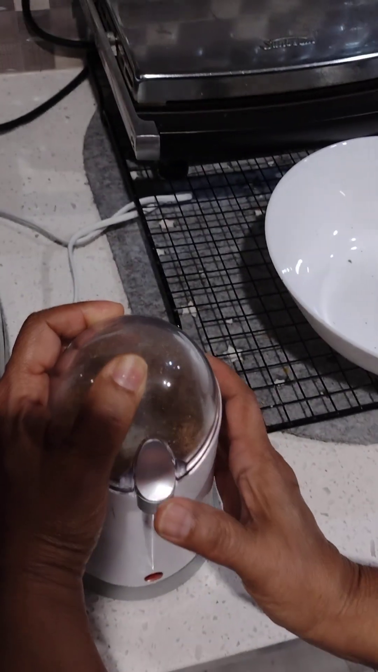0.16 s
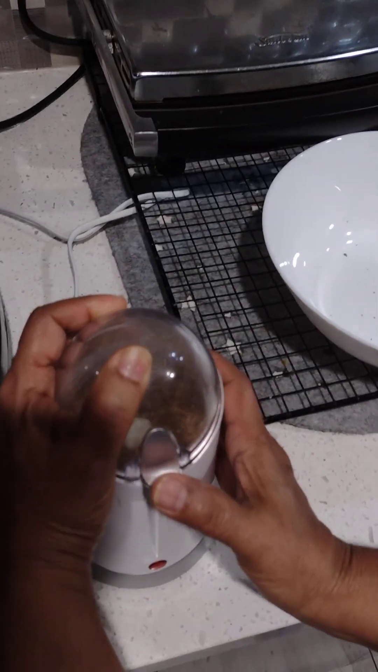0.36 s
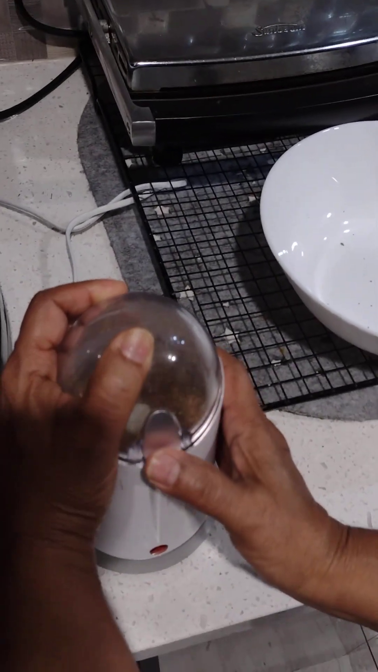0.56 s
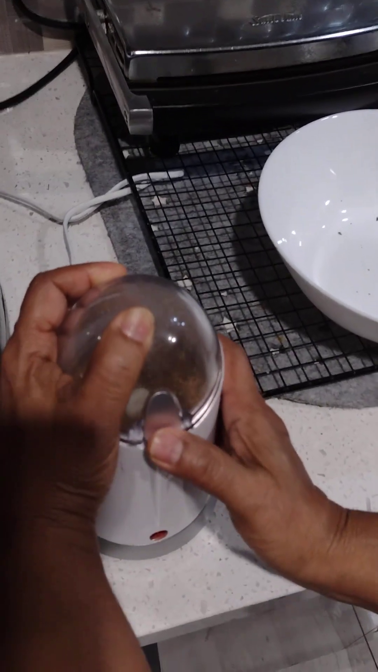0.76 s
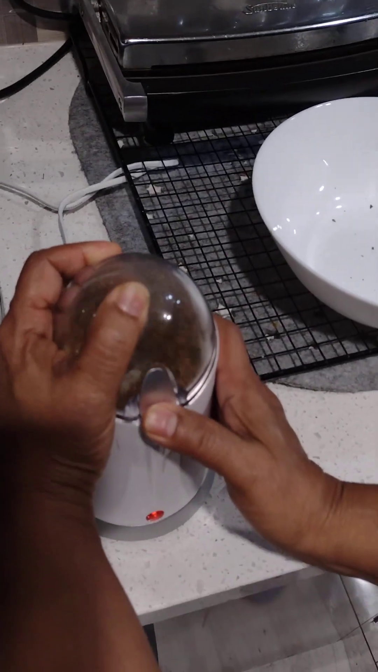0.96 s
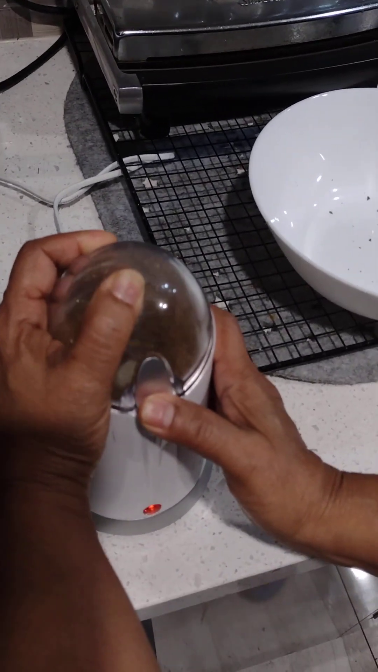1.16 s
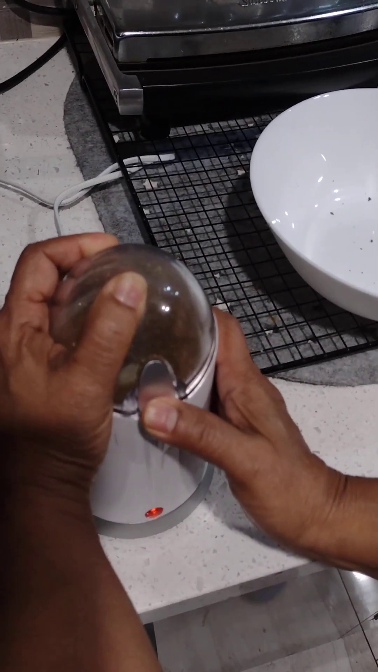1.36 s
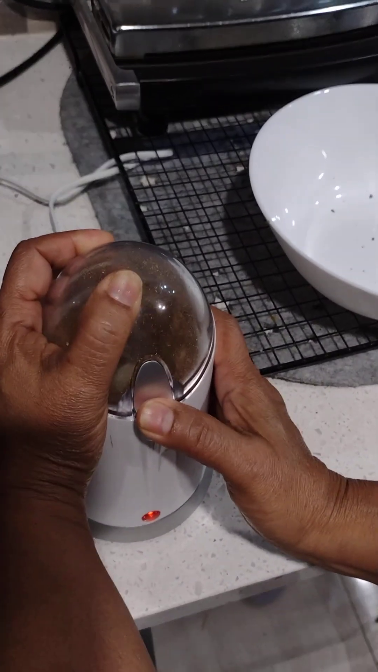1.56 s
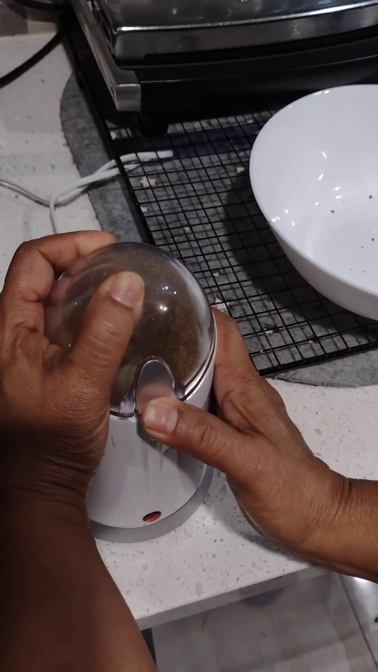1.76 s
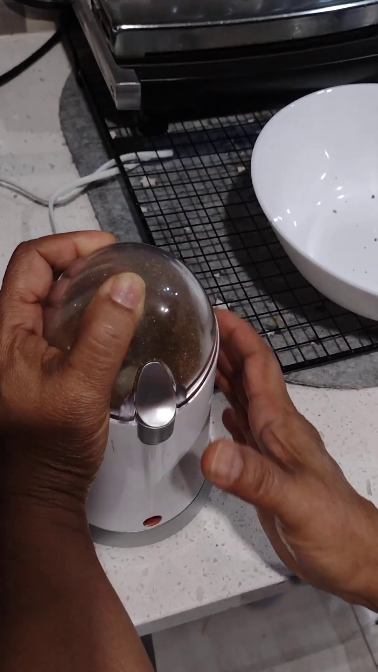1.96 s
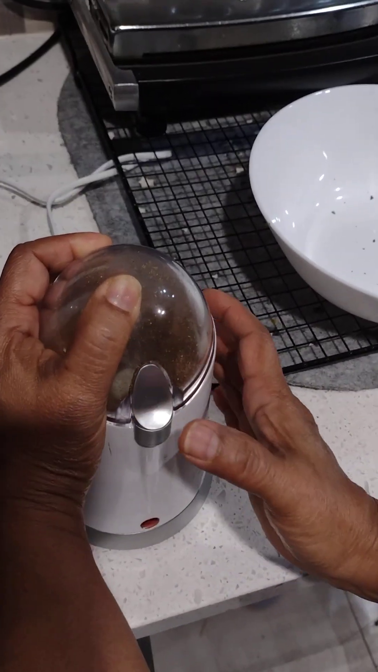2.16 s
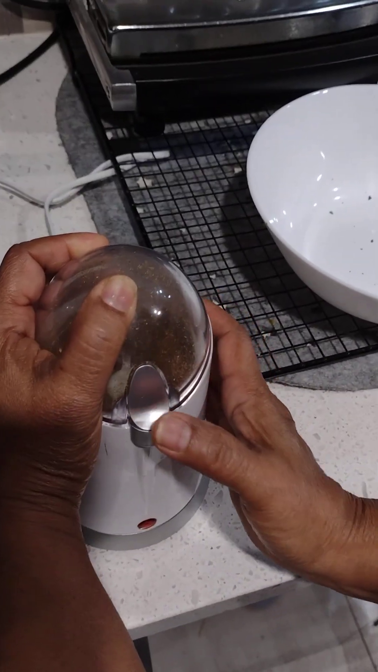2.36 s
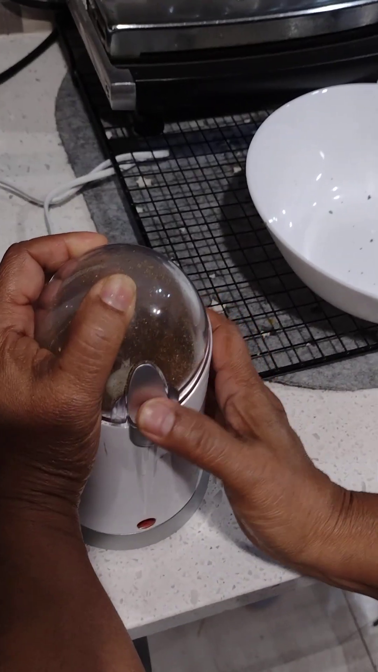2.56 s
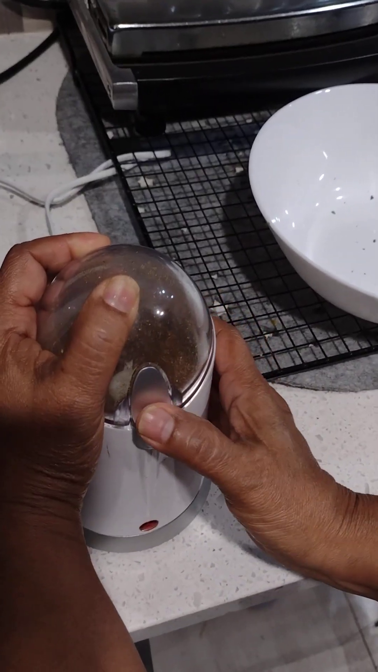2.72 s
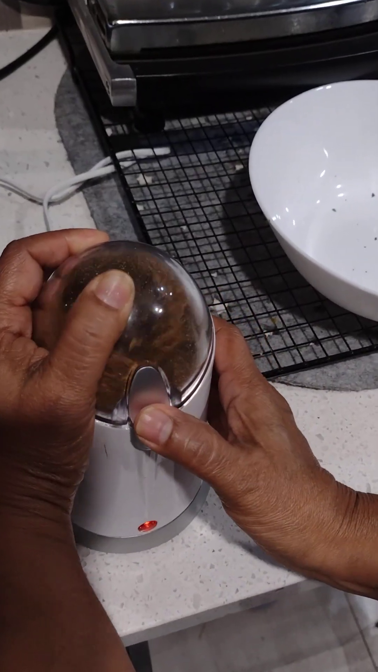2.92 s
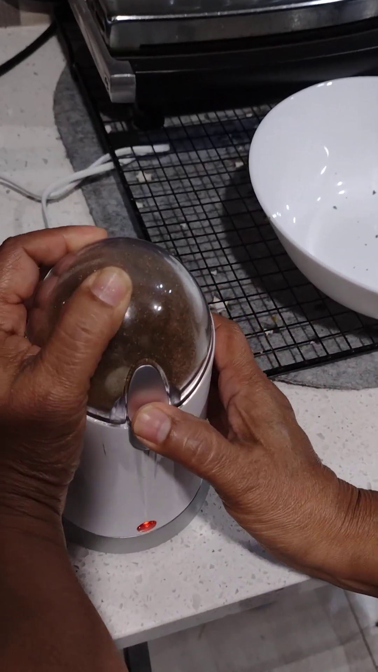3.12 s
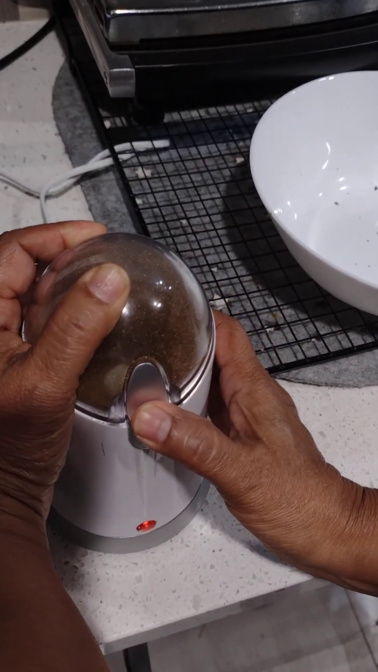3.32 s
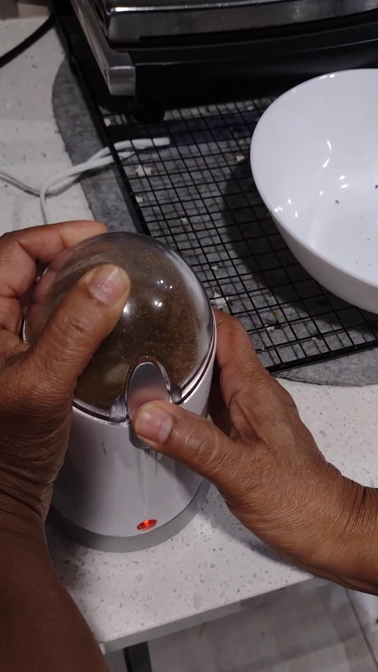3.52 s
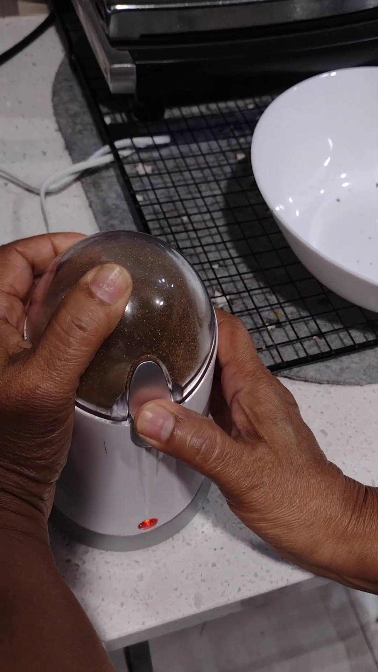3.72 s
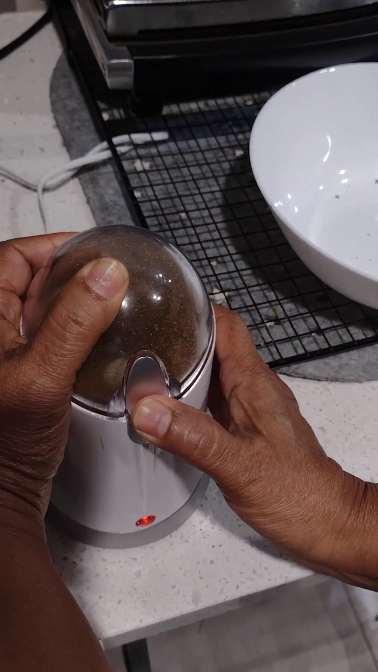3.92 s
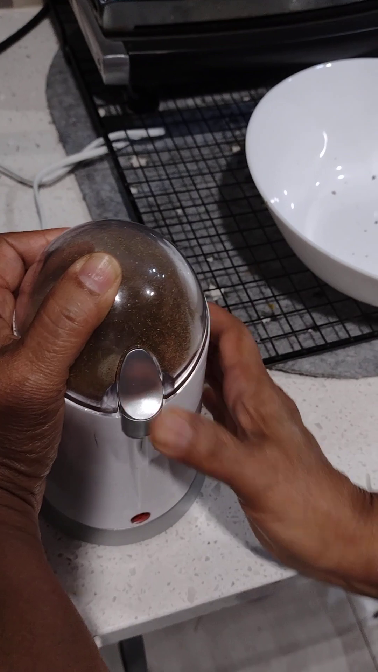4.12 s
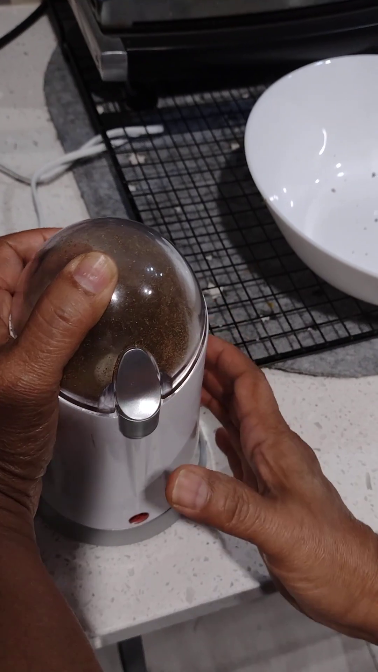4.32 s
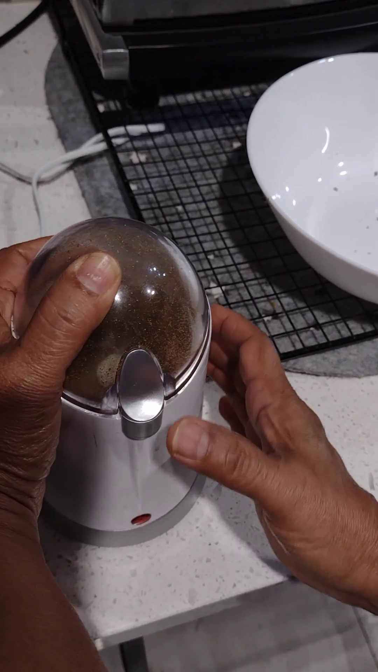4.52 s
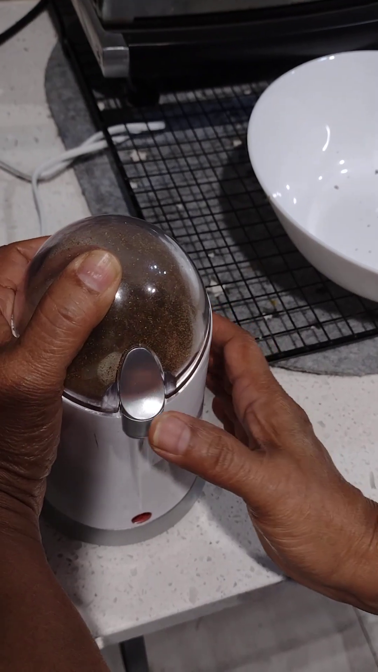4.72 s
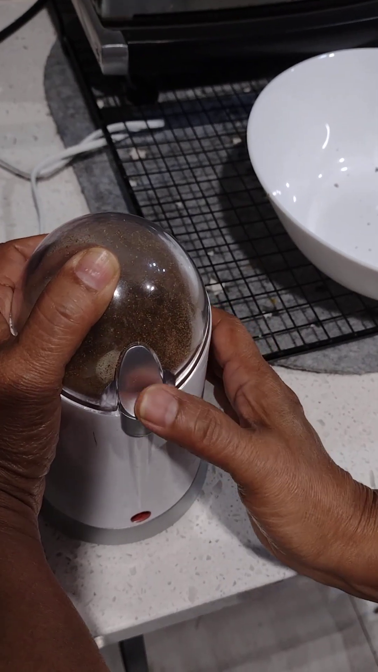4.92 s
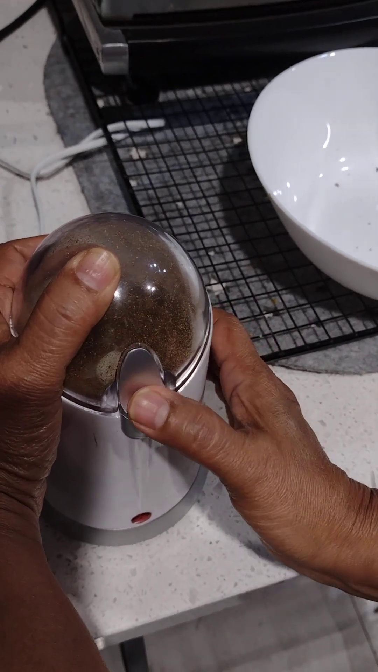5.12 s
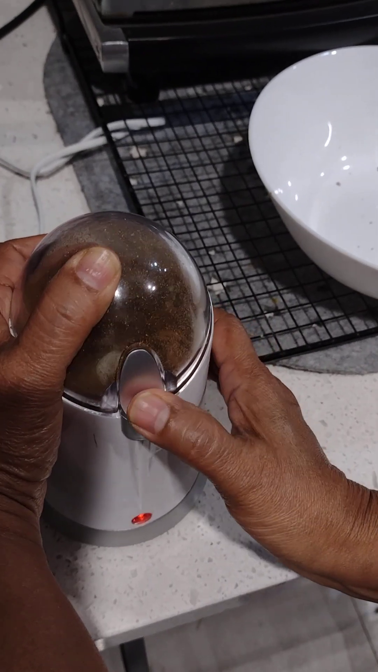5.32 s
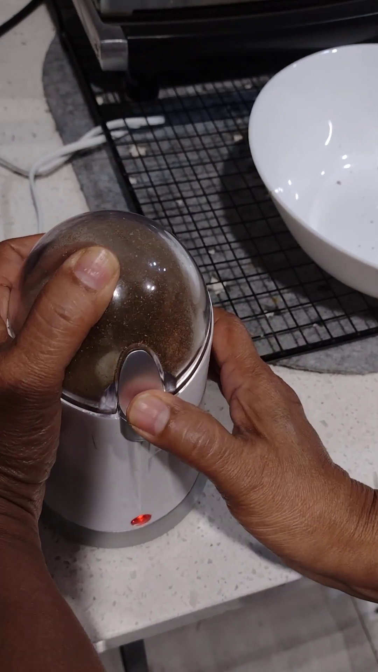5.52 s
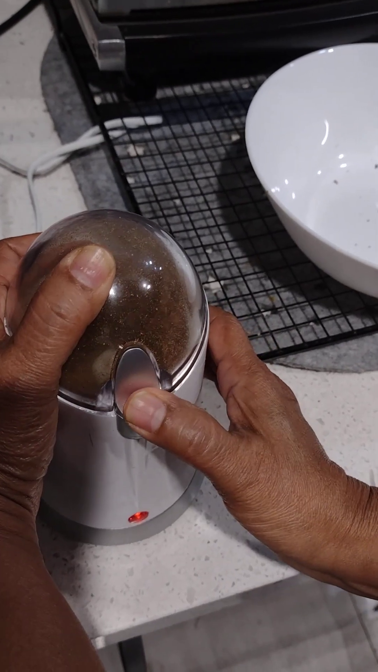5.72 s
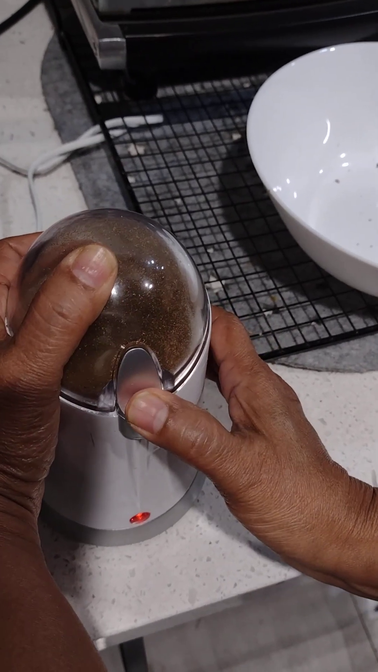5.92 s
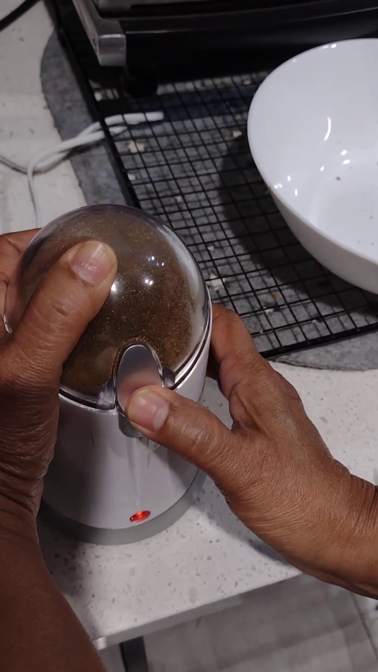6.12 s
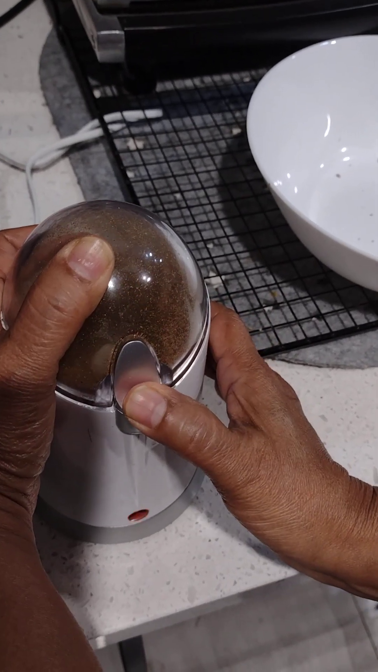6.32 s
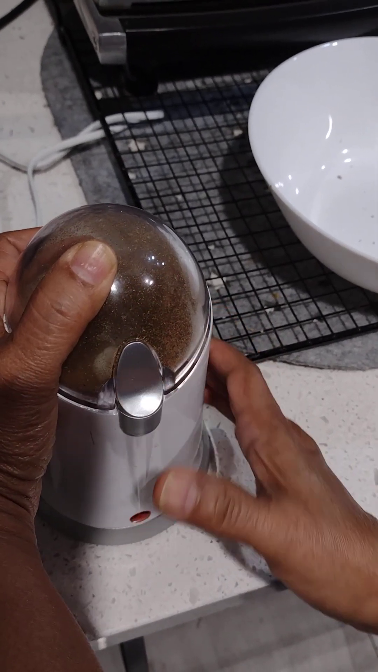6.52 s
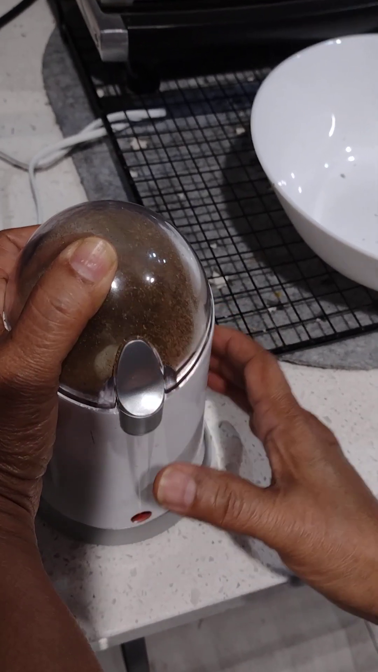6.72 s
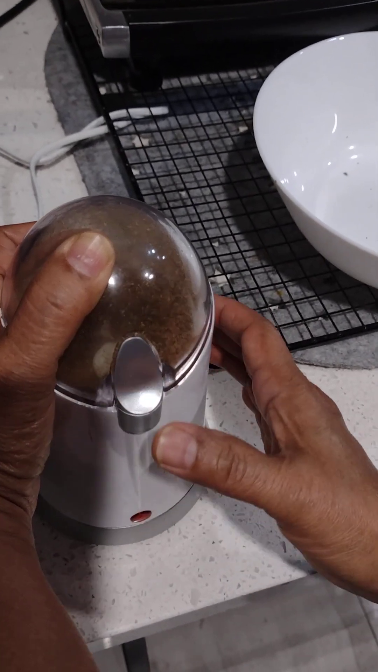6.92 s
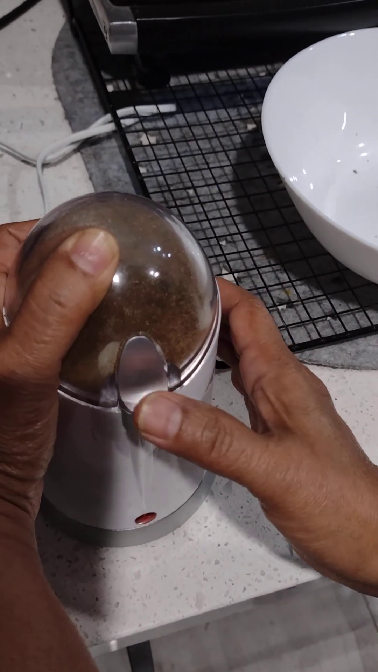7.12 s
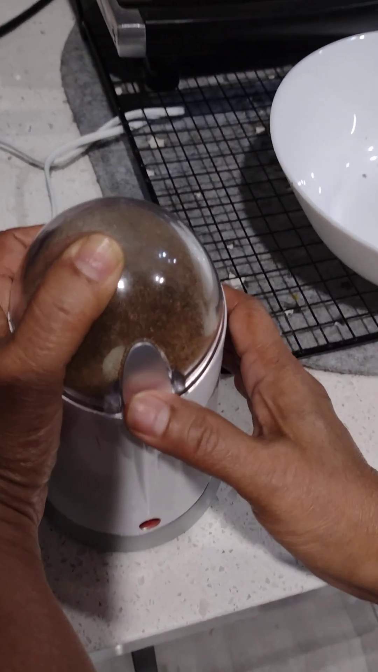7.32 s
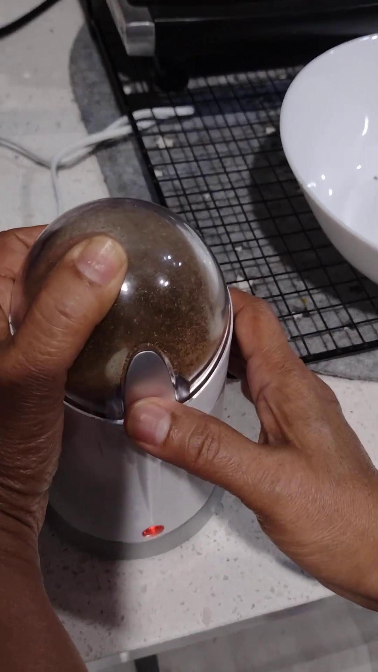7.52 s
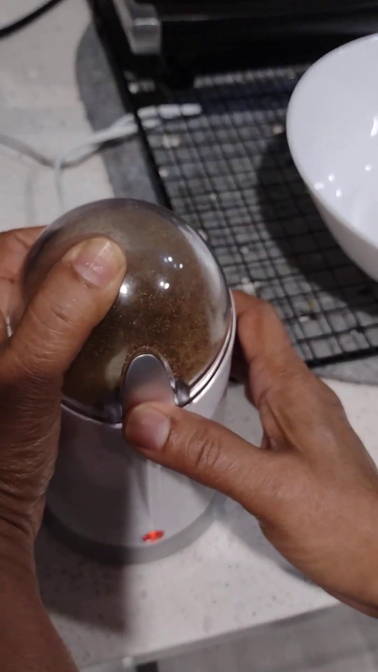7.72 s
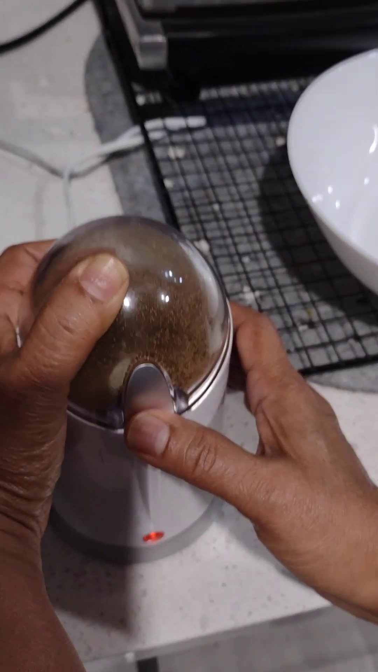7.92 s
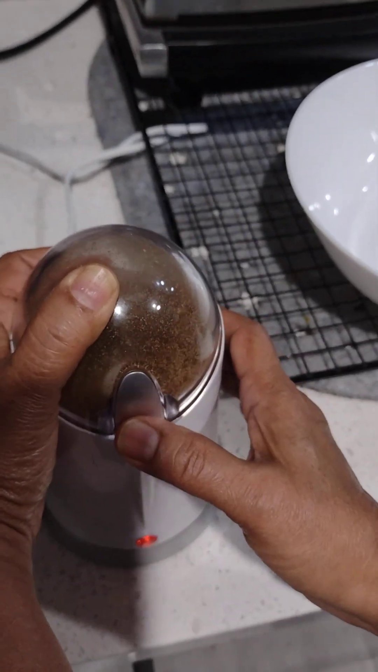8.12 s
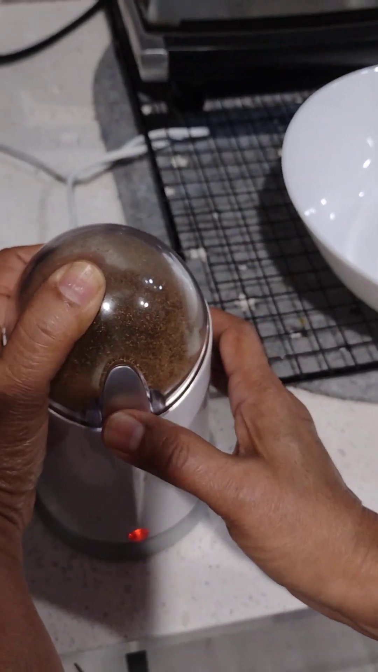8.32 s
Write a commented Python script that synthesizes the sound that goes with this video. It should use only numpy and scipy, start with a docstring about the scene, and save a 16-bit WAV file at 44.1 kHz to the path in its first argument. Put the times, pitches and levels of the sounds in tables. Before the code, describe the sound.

A small blade grinder heard close, in stereo, in a kitchen with short reflections and very quiet room tone. At 0 s it is already slowing: falling motor whir, loud coarse clatter and sharp cracks, settling by about 0.4. At 0.9 a thump and jerk start a burst; pitch climbs fast into a rough buzz with high brush whine, bright gritty hiss and dense rattle, cracks near 1.2 and 1.5. Released at 1.8, it winds down with pieces knocking and rolling until about 2.4. A longer burst runs 2.95 to 4.1, coasting with cracks to about 4.7. A soft thumb tap at 5.1 precedes a run from 5.3 to 6.4, its spice finer and somewhat softer, then rolling and knocking down to 7.0. The last burst starts at 7.6 with a grainy surge, spins up a little quicker, and is still whirring at full tilt when it cuts off around 8.5.

```python
"""A small blade grinder on a kitchen counter coasts to rest, then runs four more times, the last to the end.
Its spinning rotor shakes the housing into ringing, buzzes in overtones, whines at the brushes and hums.
Hard spice is random impacts: fine grit hisses and coarse pieces rattle, thud at the start and roll as it slows.
Whole pieces crack on lid and blade, and a thumb lands on the button once.
The room adds short reflections and a quiet tone; two microphone ports hear it all."""
import sys
import numpy as np
from scipy import signal
from scipy.fft import rfft, irfft, next_fast_len
from scipy.io import wavfile

SR = 44100
rng = np.random.default_rng(int(sys.argv[2]) if len(sys.argv) > 2 else 0)


def transcribe(signal):
    """Save signal, clipped to [-1, 1], as a 16-bit WAV file at the path in sys.argv[1]."""
    frames = np.atleast_2d(signal).T
    limited = np.clip(frames, -1, 1)
    pcm = np.round(limited * 32767).astype(np.int16)
    wavfile.write(sys.argv[1], SR, pcm)


N = 368808
TIME = np.arange(N) / SR   # seconds
SIZE = next_fast_len(N + SR // 2) // 2 * 2   # even length for the spectrum, with room for tails
FREQS = np.maximum(np.arange(SIZE // 2 + 1) * SR / SIZE, 1)   # Hz
MAINS_HZ = 50

TOP_HZ = 376   # turns per second that a long run approaches
JERK_SHARE, JERK_S = 0.335, 0.048   # part of that speed won by the first jerk, and its time constant
DRAG_S, FRICTION_HZ_PER_S = 2.0, 464   # coasting: time constant of the drag, steady braking of the bearings


def rotor_speed(on, off, spin_up_s):
    """Turns per second: a jerk and a slower climb, then drag and friction bring the rotor to rest."""
    driven = np.clip(TIME - on, 0, off - on)
    coasted = np.maximum(TIME - off, 0)
    jerk_left = JERK_SHARE * np.exp(-driven / JERK_S)
    climb_left = (1 - JERK_SHARE) * np.exp(-driven / spin_up_s)
    reached = TOP_HZ * (1 - jerk_left - climb_left)
    braking = FRICTION_HZ_PER_S * DRAG_S
    return np.maximum((reached + braking) * np.exp(-coasted / DRAG_S) - braking, 0)


# Each press of the button; finer spice lets the rotor gather speed sooner:
# on_s, off_s, spin_up_s, whine_db (relative), hollow_db (spice lost at the hollow), grip_db (damping by the hand)
RUNS = [(-1.3, -0.285, 0.21, -38, 0, 0), (0.885, 1.798, 0.203, -33.5, 3, 7),
        (2.951, 4.098, 0.196, -32, 3, 0.5), (5.269, 6.405, 0.185, -35, 6, 0),
        (7.592, 8.6, 0.177, -33.5, 6, -2)]
HOLLOW_S, HOLLOW_WIDTH_S = 0.115, 0.04   # soon after the start the blade has dug a hollow in the heap
GRIT_FOLLOWS, RATTLE_FOLLOWS = 0.3, 0.3   # loudness grows as this power of the speed
GRIT_SETTLES_S, GRIT_FALL_DB_PER_S = 0.492, 160   # after release the fine grit comes down first
RATTLE_SETTLES_S, RATTLE_FALL_DB_PER_S = 0.575, 175   # the coarse pieces roll a little longer


def controls(switch_s=0.013):
    """Each press sets speed, current on/off, and the levels of housing shake, whine, grit and rattle."""
    speed, power, damping_db, whine, grit, rattle = np.zeros((6, N))
    for on, off, spin_up_s, whine_db, hollow_db, grip_db in RUNS:
        turns = rotor_speed(on, off, spin_up_s)
        started = np.clip((TIME - on) / switch_s, 0, 1)
        held = started * np.clip((off - TIME) / switch_s + 1, 0, 1)
        stirred = started * from_db(-hollow_db * swell(on + HOLLOW_S, HOLLOW_WIDTH_S))
        speed += turns
        power += held
        damping_db += grip_db * (turns / TOP_HZ) ** 6   # the hand damps the fastest shaking most
        whine += held * from_db(whine_db)
        grit += stirred * airborne(turns, off, GRIT_FOLLOWS, GRIT_SETTLES_S, GRIT_FALL_DB_PER_S)
        rattle += stirred * airborne(turns, off, RATTLE_FOLLOWS, RATTLE_SETTLES_S, RATTLE_FALL_DB_PER_S)
    grit_db, rattle_db = load()
    return speed, power, from_db(-damping_db), whine, grit * from_db(grit_db), rattle * from_db(rattle_db)


# Ringing of the housing on the counter, shaken once a turn: pitch_hz, width_hz, level_db
HOUSING = [(119, 14, -46), (190, 14, -36.5), (254, 22, -31.5), (323, 10, -39.5), (361.8, 12, -45)]


def rotor(angle, pace):
    """Imbalance sweeps through the housing resonances; at a crawl it fades and the rotor knocks twice a turn."""
    crawling = np.clip((0.42 - pace) / 0.087, 0, 1)
    knock = from_db(-10.5) * np.sin(2 * angle) * crawling
    strength = np.minimum(pace / 0.46, 1) ** 1.8
    flicker = from_db(1.4 * drift(25))
    shake = np.sqrt(2) * (np.sin(angle) + knock) * strength * flicker
    return sum(from_db(db) * resonate(shake, hz, width) for hz, width, db in HOUSING)


# Overtones of the rotation, some shifted by the pulsing torque:
# multiple (of the turning rate), offset_hz, level_db (at full speed, under power)
ORDERS = [(1, 100, -59.5), (1, 200, -57), (2, 0, -58), (2, 200, -55), (3, -100, -57), (3, 0, -52),
          (3, 100, -58), (4, -100, -49.5), (4, 0, -44.5), (4, 100, -57), (5, 0, -49), (5, 100, -48.5),
          (6, 0, -55), (8, 0, -59.5), (9, 0, -57)]
# Without the pulsing torque the low overtones stand out and the high ones fade.
COAST_LIFT_DB, COAST_FADE_DB_PER_ORDER = 9, 2.2


def buzz(angle, speed, pace, power):
    """Rough overtones, coloured by the cup; the offset ones sound only while current flows."""
    wobble = (0.054 + 0.04 * (1 - power)) * drift(45)   # radians, roughens the tones
    out = np.zeros(N)
    for multiple, offset_hz, db in ORDERS:
        k = round(multiple)
        offset = round(offset_hz / MAINS_HZ) * MAINS_HZ
        cup_db = at_hz(RATTLE, k * speed + offset) - at_hz(RATTLE, k * speed.max() + offset)
        line = np.sin(k * (angle + wobble) + 2 * np.pi * (offset * TIME + rng.random()))
        if offset:
            presence = power
        else:
            presence = from_db((COAST_LIFT_DB - COAST_FADE_DB_PER_ORDER * k) * (1 - power))
        out += from_db(db + cup_db + 2.0 * drift(20)) * line * presence
    return np.sqrt(2) * out * pace ** 1.18


# How well the housing passes on the whine: pitch_hz, gain_db
WHINE_GAIN_DB = [(2650, -22), (2950, -9.5), (3150, -3.5), (3400, -3), (3660, 1), (3780, -1)]


def commutator(angle, speed, mains, count=10):
    """Ten segments pass the brushes each turn; torque pulsing twice a mains cycle adds side tones."""
    phase = count * angle + 0.18 * drift(50)
    upper = from_db(-3) * np.sin(phase + 2 * mains)
    lower = from_db(-12) * np.sin(phase - 2 * mains)
    tone = np.sin(phase) + upper + lower
    return tone * from_db(at_hz(WHINE_GAIN_DB, count * speed) + 1.5 * drift(23))


# Magnetic hum of the fixed coils: pitch_hz, level_db (at full speed)
HUM = [(100, -65), (200, -55), (300, -70)]


def stator(mains, pace, inrush_db=15):
    """The hum is strongest while the slow rotor draws a heavy current."""
    lines = sum(from_db(db) * np.sin(round(hz / MAINS_HZ) * mains) for hz, db in HUM)
    inrush = inrush_db * np.minimum(1 - pace ** 2, 0.8)
    return np.sqrt(2) * lines * from_db(inrush + 0.71 * drift(12))


# Colour of the coarse pieces: pitch_hz, level_db per Hz (relative)
RATTLE = [(40, -36.5), (90, -20), (150, -24.5), (250, -10.5), (400, -19), (560, -12.5), (800, -15.5),
          (1200, -12.5), (1510, -0.3), (1720, -3), (1980, -0.5), (2400, -12), (3300, -12), (4400, -13),
          (6000, -32)]
# Colour of the fine grit: pitch_hz, level_db per Hz (relative)
GRIT = [(1000, -30.5), (2500, -6.5), (3000, -5.5), (3450, 0.5), (4300, 0.5), (5100, -2.5), (6100, -2.5),
        (7300, -5), (8400, 3), (9300, -0.5), (11400, -1), (12400, -3.5), (13200, -3.5), (14000, -6.5),
        (15800, -7.5)]
CUP_HZ, CUP_WIDTH_HZ, CUP_DB = 1530, 200, 3.5   # ring of the cup under slowly rolling pieces
ROLLS_BELOW = 0.6   # share of full speed below which the coarse pieces start to roll


def spice(angle, pace, throb, grit, rattle):
    """Faster blades strike more often; hits bunch once a turn and as chips shatter; slow pieces roll."""
    clumps = from_db(0.67 * drift(40)) * (1 + 0.15 * np.sin(angle)) * (1 + 0.026 * throb)
    clumps *= chips(per_s=75, fade_s=0.0055, share=0.35)
    fine = grains(per_s=5000 + 14000 * pace, spread_db=3.0) * from_db(0.7 * drift(70)) * clumps * grit
    coarse = grains(per_s=1800 + 3500 * pace, spread_db=2.0) * clumps * rattle
    rolling = np.clip(1 - pace / ROLLS_BELOW, 0, 1)
    cup = from_db(CUP_DB) * resonate(coarse * rolling, CUP_HZ, CUP_WIDTH_HZ)
    hiss = from_db(-2.3) * colour(fine, GRIT)
    clatter = from_db(-4.3) * colour(coarse * (1 - rolling / 2), RATTLE)
    return hiss + clatter + cup


def chips(per_s, fade_s, share):
    """Gain from random shatterings: each throws up a spray at once, which then thins out; mean power 1."""
    hits = (rng.random(N) < per_s / SR) * np.minimum(rng.exponential(1, N), 3)
    spray = signal.lfilter([1], [1, -np.exp(-1 / (fade_s * SR))], hits + 1e-12)
    return np.sqrt(1 - share + share * spray / spray.mean())


def airborne(speed, off, follows, settles_s, fall_db_per_s):
    """Gain of the flying spice: it follows the blade's speed until it settles, then dies away."""
    settle = off + settles_s
    pace = np.interp(np.minimum(TIME, settle), TIME, speed) / TOP_HZ
    return pace ** follows * from_db(-fall_db_per_s * np.maximum(TIME - settle, 0))


# Spice in the path of the blade: time_s, grit_db, rattle_db (both relative)
LOAD = [(0.05, -27, -27), (0.3, -31, -28), (0.9, -29.5, -30), (1.57, -29, -29.5), (1.63, -35, -35),
        (1.8, -33.5, -35), (2.05, -30, -31), (2.4, -29.5, -30), (2.95, -30, -31), (3.6, -30.5, -30.5),
        (4.2, -31.5, -32.5), (4.7, -34, -31.5), (5.3, -33, -32.5), (5.95, -31.5, -31), (6.45, -31.5, -32.5),
        (7.0, -35.5, -31), (7.65, -35.5, -32.5), (8.3, -35, -30.5)]
# Clumps sliding into the blade: time_s, half_length_s, grit_swell_db, rattle_swell_db
CLUMPS = [(0.925, 0.025, 2.5, 5.5), (1.105, 0.025, 2.5, 2.5), (2.137, 0.02, 3, 3), (2.235, 0.02, 2, 2),
          (2.985, 0.025, 4, 4.5), (3.155, 0.015, 4, 0), (3.92, 0.02, 3, 0), (4.48, 0.025, 4, 2),
          (5.3, 0.018, 1, 3.5), (5.57, 0.035, 3, 0), (7.64, 0.02, 5, 1), (7.82, 0.04, 7, 3.5),
          (8.235, 0.025, 3, -2)]


def load():
    """Levels of grit and rattle in dB: the slowly changing charge, plus a swell for each clump."""
    s, *levels = np.transpose(LOAD)
    slow = np.array([np.interp(TIME, s, db) for db in levels])
    return slow + sum(np.outer(swell_db, swell(at, half_s)) for at, half_s, *swell_db in CLUMPS)


# Hard pieces hitting lid and blade: time_s, knock_db, ping_db (both relative)
CRACKS = [(0.0363, -36, -27), (0.0517, -33, -24), (0.0817, -23, -26), (0.1171, -18, -19.5),
          (0.1204, -21.5, -22), (1.1997, -26, -22.5), (1.271, -26, -29), (1.5007, -21.5, -30),
          (1.5526, -23, -20), (1.5651, -21, -17), (2.0093, -25, -32), (2.1236, -23, -30),
          (2.2378, -24, -27), (2.2563, -19.5, -33), (3.0098, -32, -17.5), (3.1363, -20, -20),
          (3.4426, -25, -23), (3.5633, -25, -24.5), (3.9727, -26, -19), (4.2742, -30, -24),
          (4.459, -24, -30), (4.5854, -23, -37), (4.593, -23.5, -43), (6.404, -23.5, -26),
          (6.482, -29, -26), (6.7508, -28.5, -34), (6.8456, -25, -25), (6.9169, -24, -26.5),
          (8.1703, -25, -33)]
# Colour of a knock on the lid: pitch_hz, level_db per Hz (relative)
LID_KNOCK = [(300, -25.5), (1600, -10), (2400, -9), (3000, -1), (4100, 1), (5500, -8.5), (8000, -16.5),
             (16000, -27)]
# Colour of a ping on the blade: pitch_hz, level_db per Hz (relative)
BLADE_PING = [(2000, -30), (6000, -13), (7600, -9), (8500, 1.5), (9400, -4.5), (11500, -5), (16000, -16.5)]


def cracks():
    """Whole pieces knock on the lid and ping on the steel blade."""
    s, knock_db, ping_db = np.transpose(CRACKS)
    knock = bursts(s, knock_db, snap_s=0.0014, scatter_s=0.012, scatter_db=-17.5)
    ping = bursts(s, ping_db, snap_s=0.0013, scatter_s=0.0078, scatter_db=-18)
    return from_db(0.8) * colour(knock, LID_KNOCK) + from_db(1.6) * colour(ping, BLADE_PING)


# Colour of the starting jolt: pitch_hz, level_db per Hz (relative)
START_THUMP = [(25, -16), (70, -3), (200, 0.5), (400, -5.5), (600, 1.5), (1000, -2), (1600, -1.5),
               (2500, -18), (8000, -33.5)]
RELEASE_JOLT_DB = -47


def start_kick(delay_s=0.016, level_db=-41):
    """Starting torque jerks the housing and shoves the blade into the heap; letting go jolts it less."""
    starts = [(on + delay_s, level_db) for on, *_ in RUNS]
    releases = [(off, RELEASE_JOLT_DB) for _, off, *_ in RUNS]
    s, db = np.transpose([(s, db) for s, db in starts + releases if 0 < s < N / SR])
    return colour(bursts(s, db, snap_s=0.012, scatter_s=0.05, scatter_db=-2), START_THUMP)


# Thumb landing on the button: time_s, level_db (relative)
TAPS = [(5.111, -50)]


def button():
    """The thumb jolts the plastic lid: a short burst in the colours of rattle, grit and thump."""
    s, db = np.transpose(TAPS)
    jolt = bursts(s, db, snap_s=0.0026, scatter_s=0.024, scatter_db=-6.5)
    rattle = from_db(-9) * colour(jolt, RATTLE)
    grit = from_db(-2) * colour(jolt, GRIT)
    thump = from_db(-7) * colour(jolt, START_THUMP)
    return rattle + grit + thump


def kitchen(x, t60, wet_db):
    """Reflections off counter and walls: a fading noise tail (60 dB in t60 s), different at each side."""
    age = np.arange(SR // 2) / SR
    tail = rng.standard_normal((2, len(age))) * from_db(-60 * age / t60) * (age > 0.002)
    tail /= np.sqrt(np.sum(tail ** 2, axis=1, keepdims=True))
    return x + from_db(wet_db) * signal.fftconvolve(x[None], tail, axes=1)[:, :N]


# Colour of the quiet room: pitch_hz, level_db per Hz (relative)
ROOM_TONE = [(25, -18.5), (70, -8.5), (130, -2.5), (230, 6), (330, -3.5), (550, -0.5), (1000, -6.5),
             (2000, -16), (3500, -17), (6000, -23), (10000, -24.5), (16000, -28.5)]


def room_tone():
    """Soft coloured noise, mostly shared by both sides, with a flickering level."""
    shared = rng.standard_normal(N) * from_db(1.6 * drift(15))
    separate = 0.25 * rng.standard_normal((2, N))
    return from_db(-63) * colour(shared + separate, ROOM_TONE)


def scene():
    """The grinder in the kitchen, over a quiet room tone."""
    speed, power, shake, whine, grit, rattle = controls()
    angle = 2 * np.pi * np.cumsum(speed) / SR
    pace = speed / speed.max()   # share of full speed
    mains = 2 * np.pi * MAINS_HZ * TIME
    throb = power * np.cos(2 * mains)
    motor = shake * rotor(angle, pace) + buzz(angle, speed, pace, power) + power * stator(mains, pace)
    motor += from_db(-3.7) * whine * commutator(angle, speed, mains)
    contents = spice(angle, pace, throb, grit, rattle) + cracks() + start_kick() + button()
    return motor + kitchen(contents, t60=0.26, wet_db=-10.0) + room_tone()


# Delayed copy heard by each microphone port: pitch_hz, left_gain, right_gain (gains without unit)
PORT_ECHO = [(700, 0.02, 0.02), (2400, 0.74, 0.79), (4950, 0.77, 0.47), (7500, 0.66, 0.73),
             (9400, 0.77, 0.4), (10300, 1.2, 0.56), (12500, 2.1, 0.15), (15000, 2, 0.1)]
# Spacing of the dips that this copy makes in the spectrum: left_hz, right_hz
NULL_HZ = [2560, 2362]
# Lean of the microphone pair: pitch_hz, left_minus_right_db
BALANCE_DB = [(60, -3), (700, -3), (1150, -2), (1500, 2), (1900, 5), (2700, -1.5), (3500, -2), (4400, -2.5),
              (6400, -3.5), (8400, -4.5), (10000, -4.5), (15000, -3.5)]
CUTOFF_HZ = 15780


def record(dry):
    """Two ports: subtracting a delayed copy cuts evenly spaced dips; then a sideways lean and a top cut."""
    hz, *sides = np.transpose(PORT_ECHO)
    echo = np.array([over_freqs(np.transpose([hz, gain])) for gain in sides])
    delay = np.exp(-2j * np.pi * FREQS / np.array(NULL_HZ)[:, None])
    comb = (1 - echo * delay) / np.maximum(echo, 1)
    lean = from_db(over_freqs(BALANCE_DB) * np.array([[0.5], [-0.5]]))
    top_cut = 1 / np.sqrt(1 + (FREQS / CUTOFF_HZ) ** 600)
    return irfft(rfft(dry, SIZE) * comb * lean * top_cut)[:, :N]


def from_db(db):
    """Decibels to gain."""
    return 10 ** (np.asarray(db) / 20)


def rms_one(x):
    """Scale to an rms (average strength) of 1."""
    return x / np.sqrt(np.mean(x ** 2) + 1e-20)


def at_hz(points, at):
    """Join (Hz, value) points on a log-frequency axis."""
    hz, value = np.transpose(points)
    return np.interp(np.log(np.maximum(at, 1)), np.log(hz), value)


def over_freqs(points):
    """(Hz, value) points read at every frequency of the spectrum."""
    return at_hz(points, FREQS)


def colour(x, points):
    """Filter that shapes the spectrum without ringing ahead (minimum phase); white noise keeps its power."""
    cepstrum = irfft(np.log(rms_one(from_db(over_freqs(points)))))
    cepstrum[1:SIZE // 2] *= 2   # fold the second half onto the first
    cepstrum[SIZE // 2 + 1:] = 0
    return irfft(rfft(x, SIZE) * np.exp(rfft(cepstrum)))[..., :N]


def resonate(x, hz, width):
    """One resonance, gain 1 on top; a narrower width in Hz rings longer."""
    r = np.exp(-np.pi * width / SR)
    feedback = [1, -2 * r * np.cos(2 * np.pi * hz / SR), r * r]
    return signal.lfilter(np.array([1, 0, -1]) * (1 - r * r) / 2, feedback, x)


def drift(rate):
    """Slow random wander with spread 1; a higher rate in Hz wanders faster."""
    r = np.exp(-40 * np.pi * rate / SR)   # made at every 20th sample, then joined up
    slow = signal.lfilter([1], [1, -2 * r, r * r], rng.standard_normal(N // 20 + 2002))[2000:]
    return np.interp(np.arange(N) / 20, np.arange(len(slow)), rms_one(slow))


def swell(s, half_s):
    """A smooth hump of height 1 around a moment."""
    return np.exp(-np.minimum(((TIME - s) / half_s) ** 2, 20))


def grains(per_s, spread_db):
    """Random impacts of uneven size, with the same mean power at any rate."""
    sizes = from_db(spread_db * np.minimum(rng.exponential(1, N), 4)) * rng.choice([-1, 1], N)
    hits = rng.random(N) < per_s / SR
    return rms_one(sizes * hits / np.sqrt(per_s))


def bursts(times, levels_db, snap_s, scatter_s, scatter_db):
    """Each blow is a brief snap of noise with a longer, softer scatter of fragments."""
    age = np.arange(SR // 8) / SR
    shape = np.exp(-age / snap_s) + from_db(scatter_db) * np.exp(-age / scatter_s)
    out = np.zeros(N + len(age))
    for s, db in zip(times, levels_db):
        start = max(round(s * SR), 0)
        out[start:start + len(age)] += from_db(db) * shape
    return out[:N] * rng.standard_normal(N)


dry = scene()
out = record(dry)
transcribe(out)
```